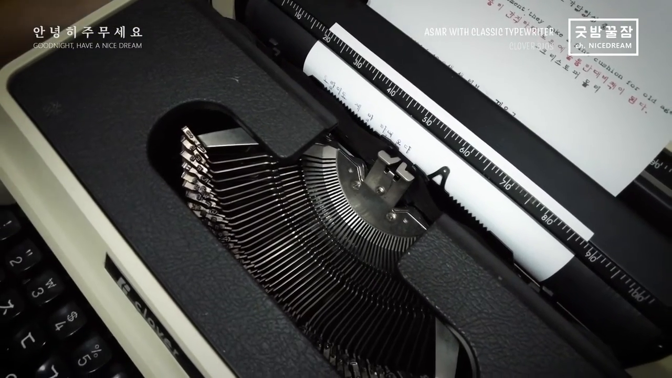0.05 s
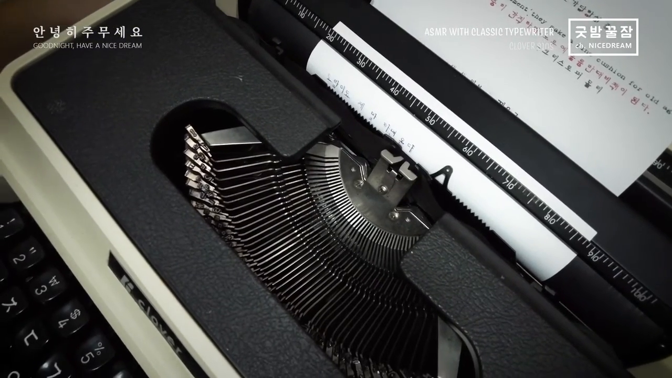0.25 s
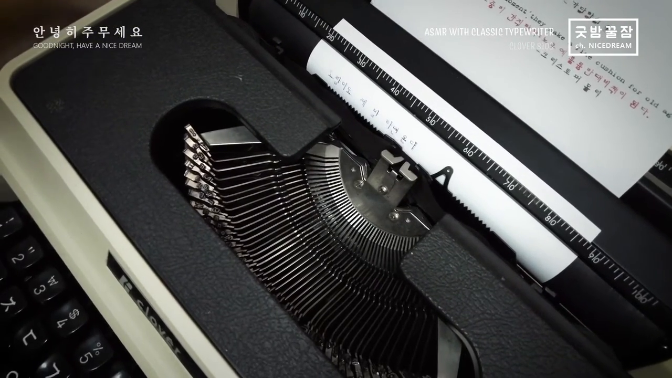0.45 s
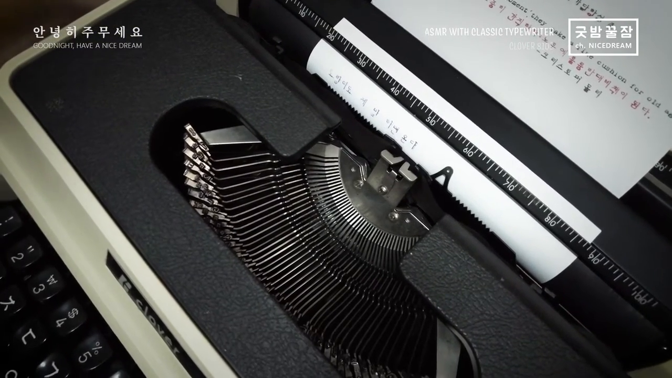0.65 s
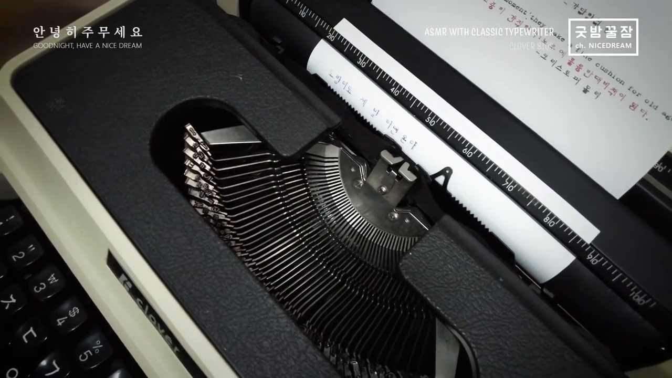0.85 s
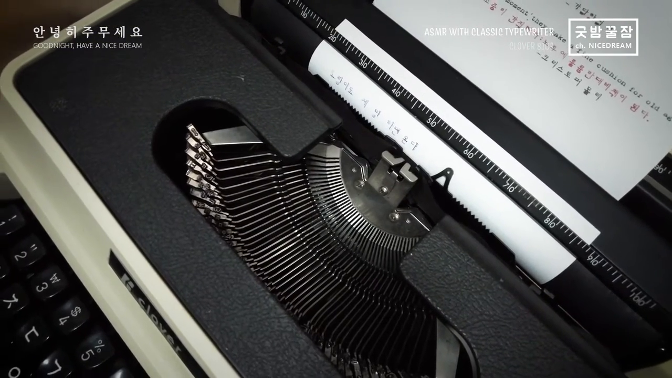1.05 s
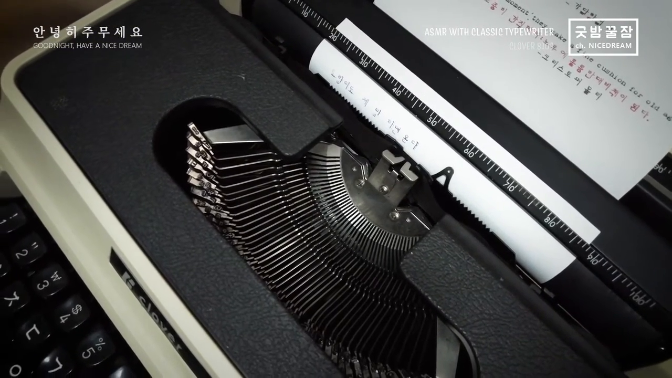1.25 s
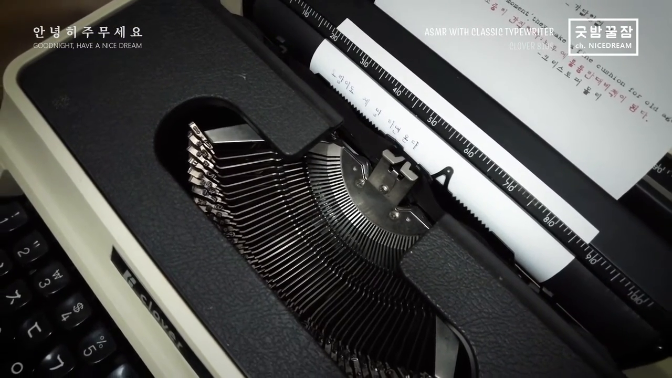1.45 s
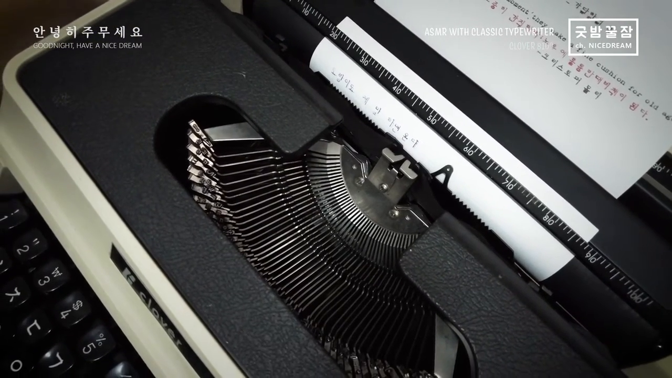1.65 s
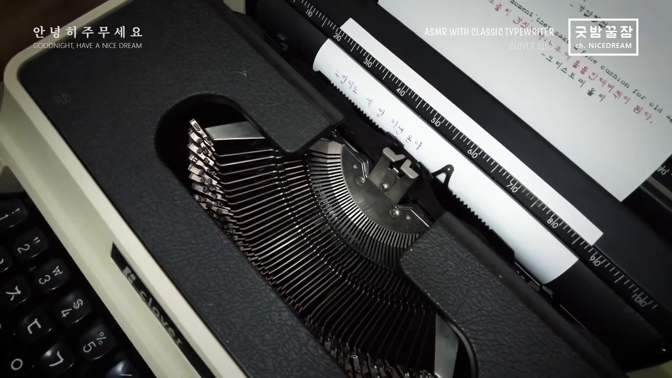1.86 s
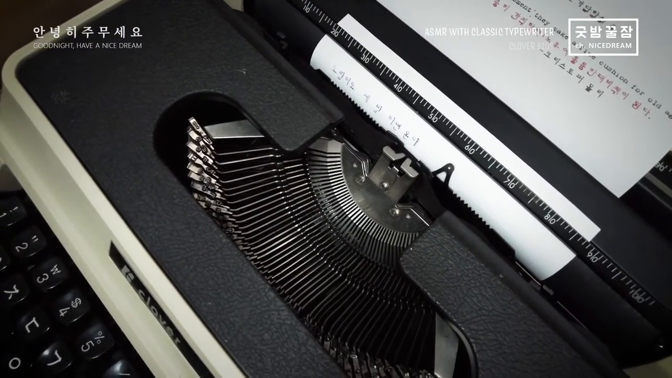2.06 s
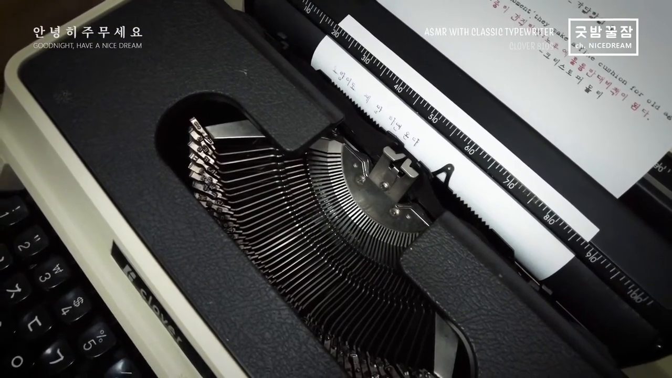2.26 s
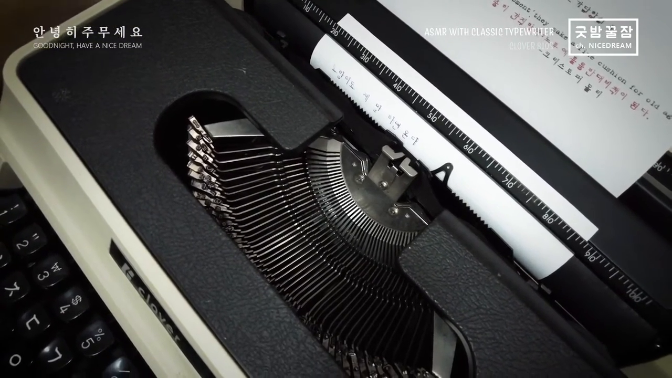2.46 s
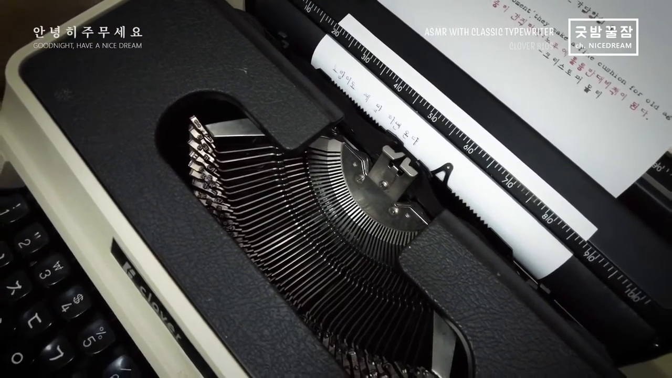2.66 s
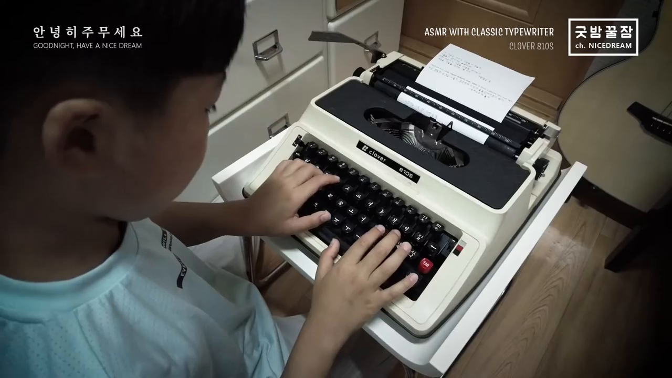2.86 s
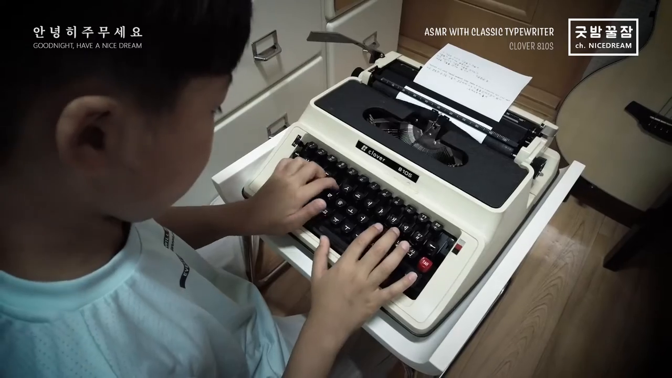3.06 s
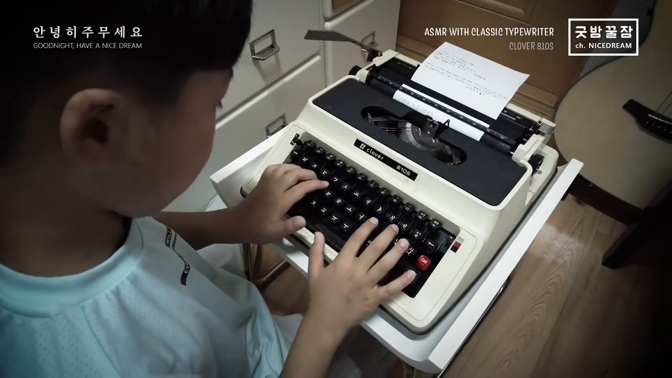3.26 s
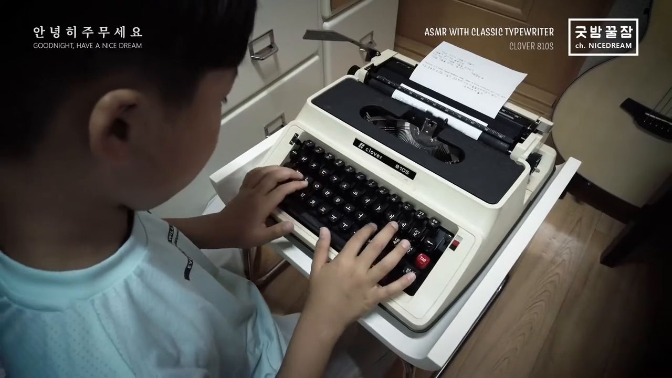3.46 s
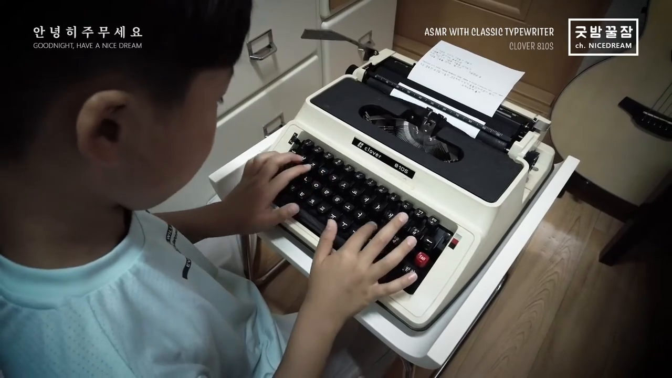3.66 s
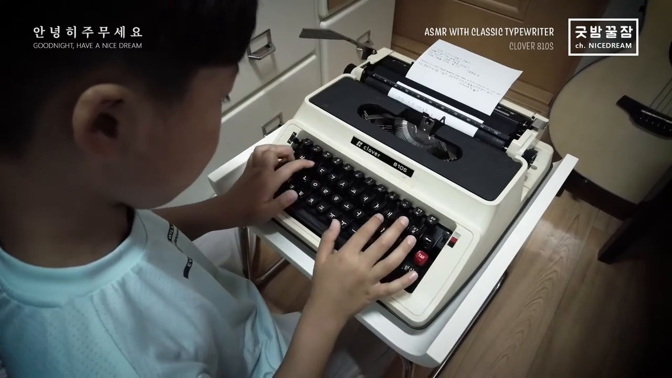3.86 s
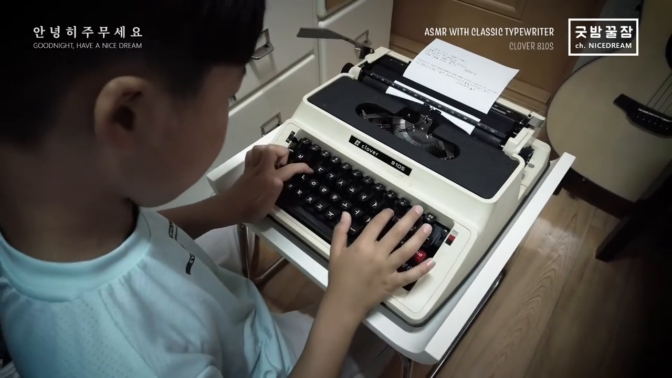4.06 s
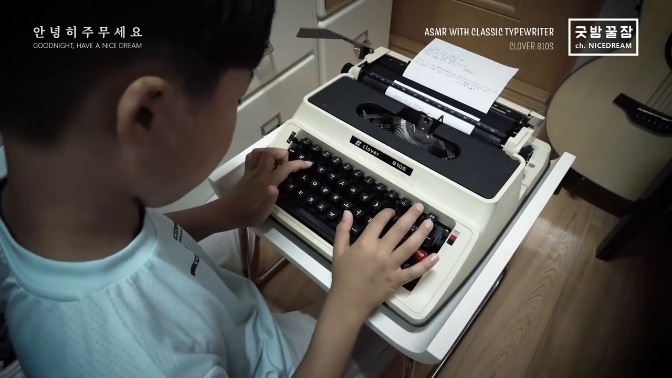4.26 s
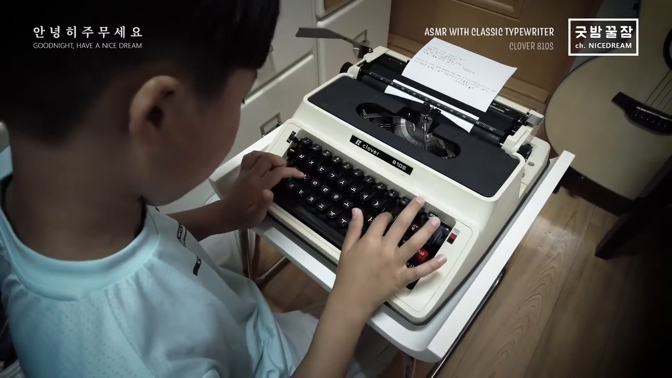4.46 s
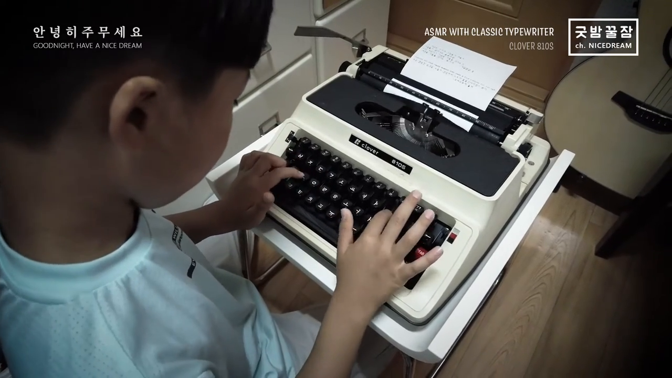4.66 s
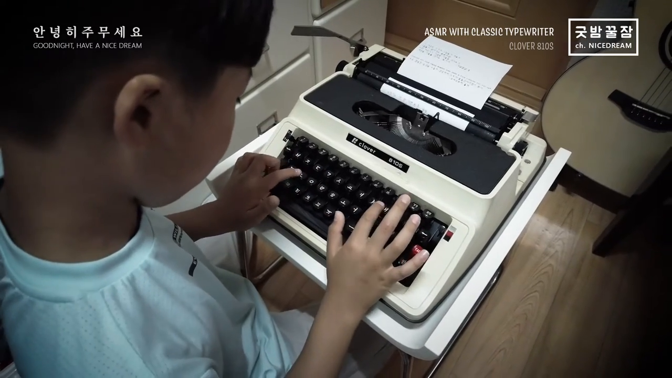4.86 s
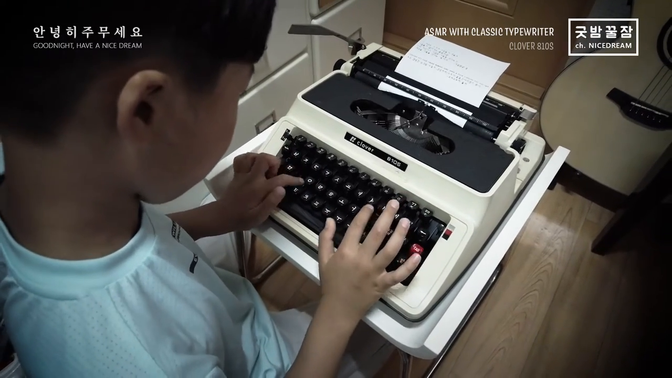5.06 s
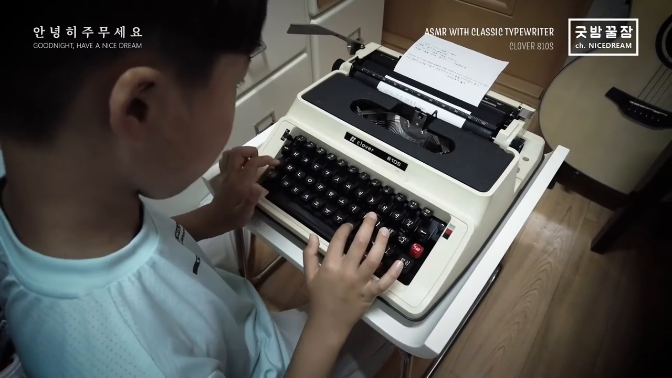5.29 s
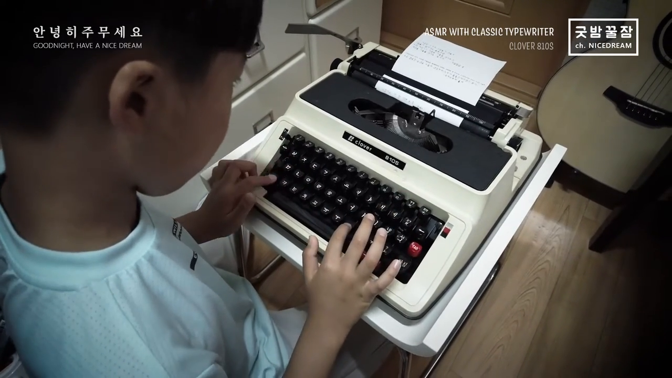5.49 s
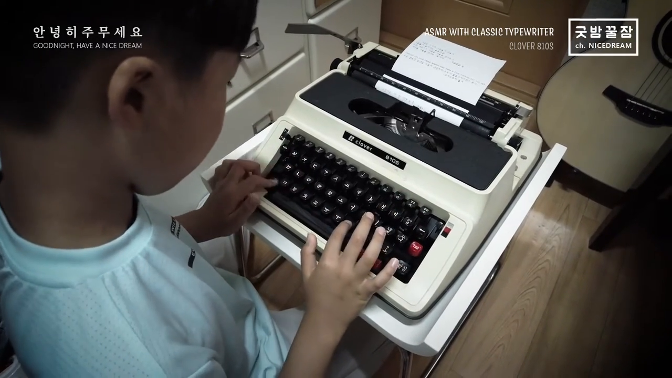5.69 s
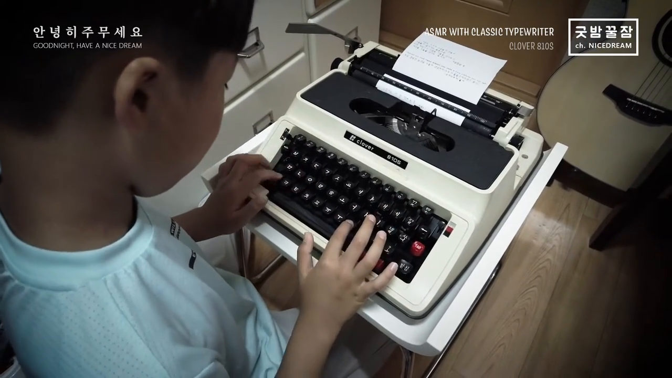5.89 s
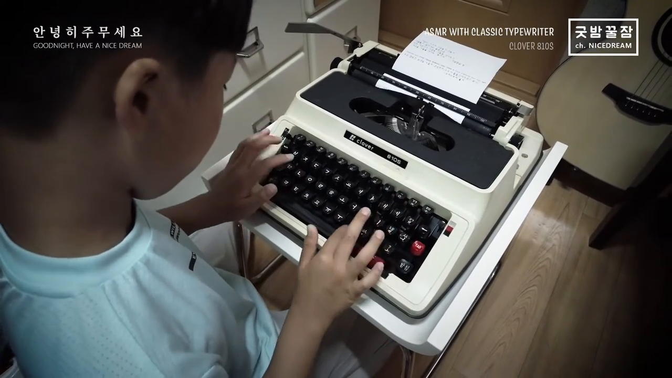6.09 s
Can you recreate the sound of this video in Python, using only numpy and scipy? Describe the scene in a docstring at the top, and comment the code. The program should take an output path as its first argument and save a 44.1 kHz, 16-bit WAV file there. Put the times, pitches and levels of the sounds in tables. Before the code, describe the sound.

After faint key touches in a quiet room, about a dozen sharp typewriter clacks sound close up, with a deep thump midway.

```python
"""A small quiet room, a microphone close to a manual typewriter on a light desk.
Fingers try the keys, then type: each key rattles its levers, the type slug cracks on the platen and the
carriage steps on. Every contact is a burst of chatter that rings desk, case, frame and steel parts.
Hands rub the machine and some strokes leave a low hum in the desk. Under it all lie a faint hush and
a low shudder that comes and goes, swelling once into a heavy thump."""
import sys
import numpy as np
from scipy import signal
from scipy.fft import rfft, irfft
from scipy.io import wavfile
from scipy.ndimage import uniform_filter1d

SR = 44100
rng = np.random.default_rng(int(sys.argv[2]) if len(sys.argv) > 2 else 0)


def transcribe(signal):
    """Save signal, clipped to [-1, 1], as a 16-bit WAV file at the path in sys.argv[1]."""
    frames = np.atleast_2d(signal).T
    limited = np.clip(frames, -1, 1)
    pcm = np.round(limited * 32767).astype(np.int16)
    wavfile.write(sys.argv[1], SR, pcm)


N = 270333

# modes of the four ringing parts, low to high: f/Hz, level/dB, t60/s before the part's ring scale
DESK_MODES = [(58, -3.5, 0.37), (115, 2.5, 0.33), (211, -3.5, 0.17)]
CASE_MODES = [(346, -3, .25), (420, -4, .28), (454, -1, .36), (590, -8, .2), (683, -3, .25), (745, -6, .2)]
FRAME_MODES = [(1099, -2.5, 0.96), (1230, 7, 0.29), (1365, 5, 0.29), (1510, 3.5, 0.18), (1740, -6, 0.2),
               (1847, 6.5, 0.26), (2082, 3, 0.38), (2190, -7, 0.16), (2470, 4.5, 0.36), (2540, 1, 0.036),
               (3120, -14, 0.084), (3200, -1, 0.33)]
STEEL_MODES = [(3700, -4, .09), (4560, -3, .09), (5157, -2, .09), (7060, -5, .1), (7420, -4, .11),
               (7600, -2, .14), (7720, -2, .13), (8580, -6, .09)]
# voicing of desk, case, frame, steel: crack low edge/Hz, crack high edge/Hz, gain/dB,
# modes over crack/dB, ring scale, rattle scale, room t60/s, room send/dB
PART_VOICING = [(45, 246, -13.5, -1, 0.99, 2, 0.22, 0.5), (302, 1150, -4.5, -2, 0.33, 1.92, 0.28, -1.5),
                (938, 3080, -11.5, -4.5, 0.058, 1.385, 0.18, -7),
                (3240, 14000, -6.5, -14.5, 0.59, 0.87, 0.19, -6)]
# tone of a bare impact: f/Hz, level/dB
CRACK_EQ = [(35, -32.5), (60, -24.5), (87, 4), (238, 1), (437, 6), (540, -7), (666, -0.5), (822, -2.5),
            (1220, 1), (3850, -10.5), (7570, -12), (11000, -18.5), (16000, -28.5)]
# tone of the room and preamp hiss: f/Hz, level/dB
HUSH_EQ = [(35, -27.5), (60, -3.5), (124, -28.5), (193, -24.5), (420, -34.5), (700, -44), (2250, -39),
           (16000, -51)]
# envelope of the shudder: t/s, level/dB
SHUDDER_ENVELOPE = [(0, -65), (.63, -66.5), (1.19, -65.5), (1.45, -60), (2.5, -67.5), (3.0, -61.5),
                    (3.11, -53), (3.53, -70.5), (3.79, -42.5), (3.93, -71.5), (4.1, -57.5), (4.39, -44.5),
                    (4.44, -17.5), (4.511, -35), (4.57, -24.5), (4.679, -49), (4.76, -34.5), (4.86, -55.5),
                    (5.0, -67), (5.45, -76.5), (5.64, -51.5), (5.841, -66.5), (6.13, -57)]
# In the four contact tables, desk, case and steel are trims on the level; the frame takes it untrimmed.
# fingers touch, test and let go of keys:
# t/s, level/dB, desk/dB, case/dB, steel/dB, rattle t60/ms, frame focus/Hz
KEY_TOUCHES = [(0.0044, -41.5, -2, -12, -12, 170, 1220), (0.0505, -44, -25, -2.5, -13, 120, 1080),
               (0.089, -61.5, -25, -11, -3, 370, 964), (0.1492, -60.5, 2, -3.5, -4, 380, 1070),
               (0.2079, -68, 9.5, 9, -1, 83, 964), (0.2556, -65, -15, 9, -31, 47, 1100),
               (0.352, -66, 16, 12.5, -31, 79, 1250), (0.429, -61.5, -5, -15, -14.5, 140, 1160),
               (1.8596, -50.5, -19, -33, -12, 130, 2080), (1.8993, -58.5, -16.5, -2.5, -12, 60, 1380),
               (2.0323, -50, -30, -19, 9.5, 62, 2770), (2.0577, -32, -58, -35, -3.5, 27, 2200),
               (2.2923, -50, -19, -37, -24, 40, 1060), (2.3154, -47.5, -38, -3.5, -25, 37, 2170),
               (2.346, -52.5, -38, -29, -14.5, 77, 2170), (2.567, -55, -43, -27, -12, 69, 2040),
               (2.579, -52.5, -44, -6, -18, 71, 1080), (2.594, -50.5, -41, -6, -14, 42, 1090),
               (2.937, -66, -43, -2.5, -9, 300, 1360), (2.976, -74, -12, 4, -2.5, 49, 1040),
               (3.1757, -41, 3.5, 1, -12, 170, 1100), (3.6663, -46.5, -7, -3.5, -18, 450, 1240),
               (4.1576, -42.5, -8.5, -6.5, -27, 104, 1190), (4.444, -39, -1, -13.5, -15.5, 270, 1290),
               (4.673, -55, -18, 0, -33, 46, 1430), (5.205, -35.5, -27, 12, -2, 15, 1120),
               (5.523, -57, -28, -9.5, -27.5, 216, 1630), (5.7516, -38, -21, -0.5, -20, 32, 1340),
               (5.7861, -27.5, -47, -10, -9.5, 55, 1130), (5.9201, -43.5, -38, -5, -15, 210, 1100),
               (5.953, -45.5, -40.5, -24, -12.5, 110, 1050)]
# type slugs hit the platen:
# t/s, level/dB, desk/dB, case/dB, steel/dB, rattle t60/ms, run-up/ms, frame focus/Hz, desk hum/dB
SLUG_STRIKES = [(2.0704, -27.5, -6, -12.5, -8, 92, 2.5, 1230, -81),
                (3.062, -9, -21.5, -15.5, -0.5, 83, 6.3, 1800, -84),
                (3.2532, -14, -34, -15, -6, 110, 6.5, 2620, -39.5),
                (3.5491, -10.5, -41, -19.5, 3, 37, 4.6, 2120, -41),
                (3.7839, -14, -23, -18, -2, 126, 2.6, 2540, -39),
                (4.0299, -10, -16, -18, -1, 90, 8.9, 1870, -60),
                (4.2573, -12.5, -45, -17, -4, 110, 2.5, 2600, -33.5),
                (4.5041, -8.5, -17, -17, 2.5, 24.5, 4.7, 1360, -46),
                (4.7868, -10.5, -30, -22, -7, 174, 2.4, 1320, -38.5),
                (5.0984, -9, -49, -18.5, -0.5, 84, 6.4, 1820, -59),
                (5.2943, -10, -39, -15, -4, 119, 9.7, 1830, -65),
                (5.6164, -7, -12.5, -11.5, -4.5, 53, 1.54, 1028, -71.5),
                (6.113, -11.5, -44, -20, 2.5, 190, 3.5, 2100, -79)]
# a pressed key takes up its levers one after another: t/s, level/dB, rattle t60/ms, frame focus/Hz
LEVER_CLICKS = [(3.0129, -39, 170, 2590), (3.0237, -23, 93, 1210), (3.204, -25.5, 150, 1170),
                (3.2231, -23.5, 200, 1500), (3.494, -50.5, 60, 1050), (3.5083, -30, 810, 1140),
                (3.709, -38, 120, 1190), (3.7218, -33, 200, 1270), (3.74, -31, 320, 1200),
                (3.7569, -18, 120, 2710), (3.9488, -36, 120, 1310), (3.9699, -32, 130, 1290),
                (3.993, -25, 160, 1880), (4.2005, -33.5, 160, 2730), (4.2092, -22, 117, 1940),
                (4.2339, -21.5, 90, 1220), (4.4588, -31.5, 110, 1290), (4.4679, -27.5, 400, 1120),
                (4.7033, -48.5, 110, 1410), (4.726, -34, 780, 1500), (4.7558, -22, 220, 1530),
                (5.044, -45.5, 41, 1490), (5.0612, -24.5, 80, 1540), (5.0717, -22, 190, 1530),
                (5.237, -28, 810, 1830), (5.597, -37.5, 76, 1430), (6.0557, -33.5, 320, 2220),
                (6.093, -32.5, 81, 2500)]
# the type bar rebounds and the carriage steps on: t/s, level/dB, steel/dB, rattle t60/ms
CARRIAGE_STEPS = [(3.076, -20, -13.5, 92), (3.261, -14, -8.5, 176), (3.2997, -24.5, -7.5, 180),
                  (3.5618, -14, 3.5, 80), (3.5795, -15.5, -4.5, 76), (3.7993, -16, -16.5, 43),
                  (3.8256, -17, -8, 84), (4.2721, -9.5, -13, 37), (4.2979, -20, -8.5, 233),
                  (4.5149, -10.5, 0, 73), (4.8295, -17, -10.5, 72), (5.1158, -17.5, -15, 94),
                  (5.3296, -18.5, -8.5, 250), (5.6359, -13.5, -8.5, 72)]
# faint hollow rubs of the hands: t/s, length/s, f/Hz, width/Hz, level/dB
HAND_RUBS = [(0.757, 0.05, 327, 62, -84), (0.776, .04, 1080, 150, -86), (1.081, 0.31, 58, 23.5, -62),
             (1.098, 0.085, 425, 50, -77.5), (1.246, 0.12, 428, 50, -75.5), (1.367, 0.25, 826, 168, -82),
             (1.482, 0.2, 1110, 960, -78.5), (1.524, 0.13, 2750, 446, -77.5),
             (1.827, 0.13, 332, 89.5, -64.5), (2.526, .08, 2010, 300, -68), (2.015, 0.045, 438, 90, -60),
             (2.6, 0.44, 656, 40, -90), (5.948, 0.093, 1087, 92, -52)]

SPAN, LEAD, RING, WHOLE = 15000, 1500, 7000, 32768  # samples: chatter, its run-up, ring, whole blow


def undb(db):
    """dB to gain."""
    return 10 ** (np.asarray(db) / 20)


def unit_rms(x):
    """Scale to rms 1."""
    return x / np.sqrt(np.mean(x ** 2))


def unit_energy(x):
    """Scale to energy 1."""
    return x / np.sqrt(np.sum(x ** 2))


def fade(t, t60):
    """Exponential decay, 60 dB in t60."""
    return np.exp(-np.log(1000) * t / t60)


def band(x, lo_hz, hi_hz):
    """Causal band-pass."""
    return signal.sosfilt(signal.butter(3, [lo_hz, hi_hz], "bandpass", fs=SR, output="sos"), x)


def equalise(x, curve, size=4096):
    """Minimum-phase EQ through (Hz, dB) points, so nothing sounds before a hit."""
    hz, db = np.transpose(curve)
    bin_hz = np.arange(size // 2 + 1) * SR / size
    log_gain = np.interp(np.log(bin_hz + 1), np.log(hz), db) * np.log(10) / 20
    cepstrum = irfft(log_gain)
    cepstrum[1:size // 2] *= 2
    cepstrum[size // 2 + 1:] = 0
    return signal.fftconvolve(x, irfft(np.exp(rfft(cepstrum))))[:len(x)]


def hush(level_db=-86):
    """A steady, dark bed of room tone and preamp hiss."""
    return undb(level_db) * unit_rms(equalise(rng.standard_normal(N), HUSH_EQ))


def shudder(hz=25, wander=.08, overtone_db=-14, flutter_db=3):
    """A deep, gusty rumble, as of a microphone support shaken through the floor; its pitch wanders, lower when
    faint."""
    level_db = np.interp(np.arange(N) / SR, *np.transpose(SHUDDER_ENVELOPE))
    drift = unit_rms(uniform_filter1d(rng.standard_normal(N), size=3000))
    pace = np.interp(level_db, (-65, -40), (.7, 1))
    phase = 2 * np.pi * np.cumsum(hz * pace * (1 + wander * drift)) / SR
    wobble = np.sqrt(2) * (np.sin(phase) + undb(overtone_db) * np.sin(2.35 * phase))
    # the faint wobble comes in gusts, the thump is firm
    gusts = unit_rms(uniform_filter1d(rng.standard_normal(N), size=4000)) * (1 - pace) / .3
    return undb(level_db + flutter_db * gusts) * wobble


def contacts(bar_rest_s=.083, lever_stop_s=.005):
    """Cue list of all contacts. Typed chatter is damped as the slug lands or the bar drops on its felt."""
    # t/s, level/dB, desk/dB, case/dB, steel/dB, rattle t60/ms, run-up/ms, focus/Hz, damped after/s
    typed = [(*row[:-1], bar_rest_s) for row in SLUG_STRIKES]
    strike_s = np.array([row[0] for row in SLUG_STRIKES])
    for s, db, steel_db, t60_ms in CARRIAGE_STEPS:
        struck_s, _, desk_db, *_ = SLUG_STRIKES[np.sum(strike_s < s) - 1]
        typed.append((s, db, desk_db + 1.5, -16, steel_db, t60_ms, 3.2, 1170, struck_s + bar_rest_s - s))
    for s, db, t60_ms, hz in LEVER_CLICKS:
        lands_s = strike_s[strike_s > s].min()
        typed.append((s, db, -31, -12, -6.5, t60_ms, 3.2, hz, lands_s + lever_stop_s - s))
    # two more columns: snap/dB (bright, steely blows snap more), light touch or not
    blows = [(*row, -9.5 + .75 * row[4], False) for row in typed]
    touches = [(*row, 2.1, hz, np.inf, -12.5, True) for *row, hz in KEY_TOUCHES]
    return blows + touches


def ringing(modes, ring_scale, focus_hz):
    """A part's modes ring out; each blow lands elsewhere and favours those near its focus, if any."""
    hz, db, t60 = np.transpose(modes)[:, :, None]
    detune, uneven = rng.standard_normal((2, len(modes), 1))
    t = np.arange(RING) / SR
    swing = np.sin(2 * np.pi * hz * (1 + .0061 * detune) * t)
    focus_db = -14 * np.abs(np.log2(hz / focus_hz)) if focus_hz else 0
    partials = undb(db + focus_db + 3 * uneven) * swing * fade(t, t60 * ring_scale)
    return unit_energy(partials.sum(axis=0))


def rattle(t60_ms, run_up_ms, snap_db, damped_s, damped_t60_s=.09, scatter_db=1.5):
    """Levers gather speed, then a sharp blow and a dying chatter of tiny, uneven rebounds."""
    t = (np.arange(SPAN) - LEAD) / SR
    after = np.maximum(t, 0)
    run_up = undb(-6) * np.exp(np.minimum(t, 0) * 1000 / run_up_ms)
    tail = fade(after, max(t60_ms, 10) / 1000) + undb(snap_db) * fade(after, .015)
    tail *= fade(np.maximum(after - damped_s, 0), damped_t60_s)
    rebounds = unit_rms(rng.standard_normal(SPAN) * undb(scatter_db * rng.exponential(size=SPAN)))
    return np.where(t < 0, run_up, tail) * rebounds


def room(t60_s, send_db, predelay_s=.004):
    """The direct sound, then the walls answer with a dense dying hiss, different for each blow."""
    t = np.arange(SPAN) / SR
    walls = rng.standard_normal(SPAN) * fade(t, t60_s) * (t > predelay_s)
    return signal.unit_impulse(SPAN) + undb(send_db) * unit_energy(walls)


def typewriter(key_hollow_hz=474):
    """Each contact's chatter is heard as a bare crack and through each part's modes, then off the walls."""
    out = np.zeros(N)
    for part, modes in enumerate((DESK_MODES, CASE_MODES, FRAME_MODES, STEEL_MODES)):
        lo_hz, hi_hz, gain_db, ring_db, ring_scale, rattle_scale, room_t60, room_db = PART_VOICING[part]
        crack = unit_energy(band(equalise(signal.unit_impulse(SPAN), CRACK_EQ), lo_hz, hi_hz))
        stem = np.zeros(N + LEAD + WHOLE)
        for s, db, desk_db, case_db, steel_db, *gesture in contacts():
            t60_ms, run_up_ms, frame_hz, damped_s, snap_db, light = gesture
            trim_db = (desk_db, case_db, 0, steel_db)[part]
            focus_hz = (0, key_hollow_hz * light, frame_hz, 0)[part]
            # bright blows ring the steel; dull ones sound hollow in the frame
            wake_db = ring_db + (0, 0, -.5 * steel_db, 1.2 * steel_db)[part]
            # a light touch leaves case and frame free: both sound clearer, the frame rings longer
            wake_db += (0, 1.5, 1.5, 0)[part] * light
            sustain = 1.5 if light and modes is FRAME_MODES else 1
            body = crack[:RING] + undb(wake_db) * ringing(modes, ring_scale * sustain, focus_hz)
            space = room(room_t60, room_db)
            chatter = rattle(t60_ms * rattle_scale, run_up_ms, snap_db, damped_s)
            blow = irfft(rfft(chatter, WHOLE) * rfft(body, WHOLE) * rfft(space, WHOLE))
            start = int(s * SR)
            stem[start:start + WHOLE] += undb(db + trim_db) * blow
        # each part's sound thins out below half the low edge of its crack
        low_cut = signal.butter(2, lo_hz / 2, "highpass", fs=SR, output="sos")
        out += undb(gain_db) * signal.sosfilt(low_cut, stem[LEAD:LEAD + N])
    return out


def hand_rubs(flutter_db=2):
    """Hands shift on the machine: soft, hollow swells of noise that flutter as the skin grips unevenly."""
    out = np.zeros(N)
    for s, length_s, hz, width_hz, db in HAND_RUBS:
        start, n = int(s * SR), int(length_s * SR)
        grip = uniform_filter1d(rng.standard_normal(SR), size=500)[:n]
        swell = np.hanning(n) ** .8 * undb(flutter_db * unit_rms(grip))
        hiss = unit_rms(band(rng.standard_normal(SR), hz - width_hz / 2, hz + width_hz / 2))[-n:]
        out[start:start + n] += undb(db) * swell * hiss
    return out


def desk_hum(hz=114, lag_s=.022, rise_s=.073, t60_s=.52):
    """Some strikes wake one low mode of the desk top, slow to bloom and slow to die."""
    t, out = np.arange(N) / SR, np.zeros(N)
    for s, *_, db in SLUG_STRIKES:
        after = np.maximum(t - s - lag_s, 0)
        bloom = (1 - np.exp(-after / rise_s)) * fade(after, t60_s)
        out += undb(db) * bloom * np.sin(2 * np.pi * hz * after)
    return out


def scene():
    """Mono mix of the machine, the hands and the desk over the hush and the shudder."""
    return (hush() + typewriter() + hand_rubs() + desk_hum() + shudder())[None]


def record(dry, ceiling=.58, top_hz=16250):
    """Soft saturation rounds the hardest cracks and a steep low-pass cuts the top."""
    high_cut = signal.ellip(10, .2, 60, top_hz, fs=SR, output="sos")
    return signal.sosfilt(high_cut, ceiling * np.tanh(dry / ceiling))


dry = scene()
out = record(dry)
transcribe(out)
```